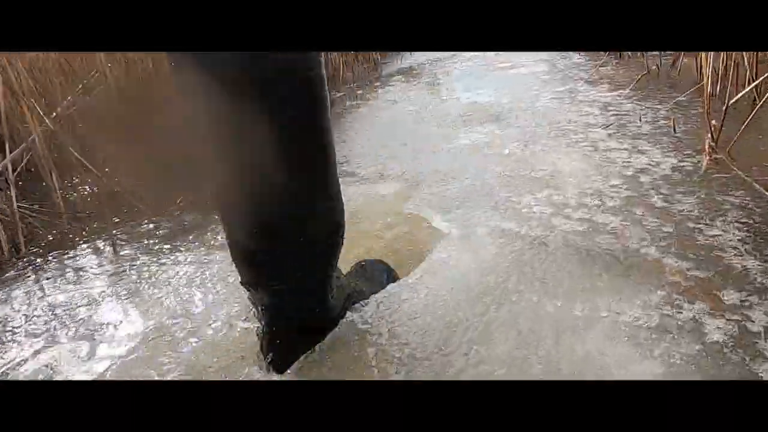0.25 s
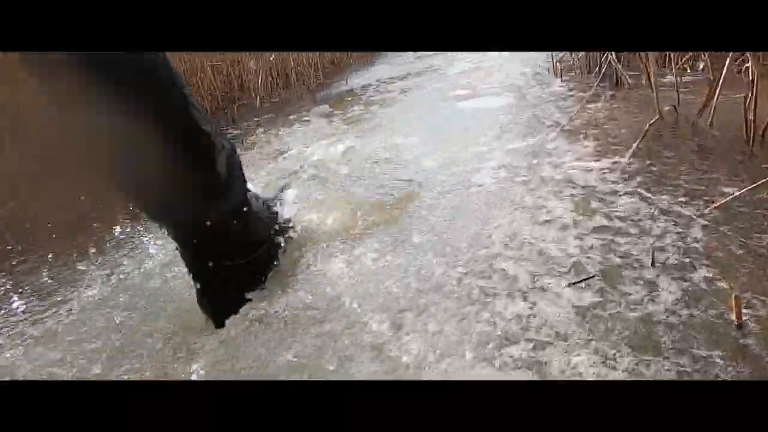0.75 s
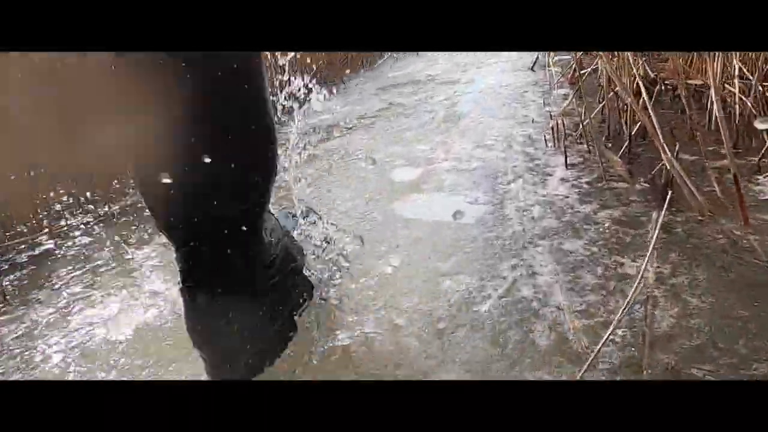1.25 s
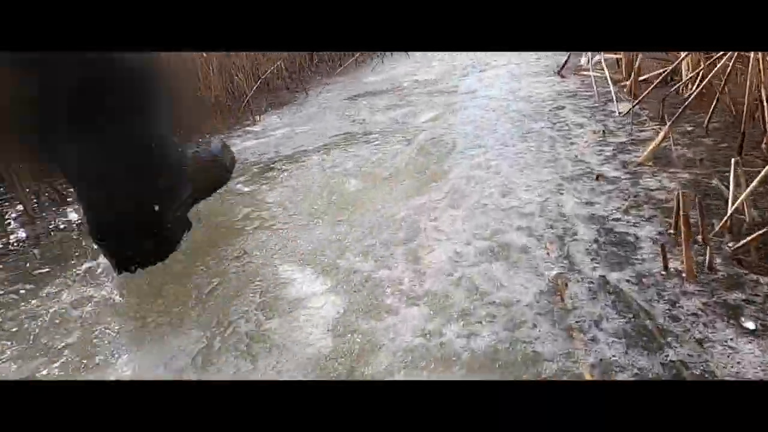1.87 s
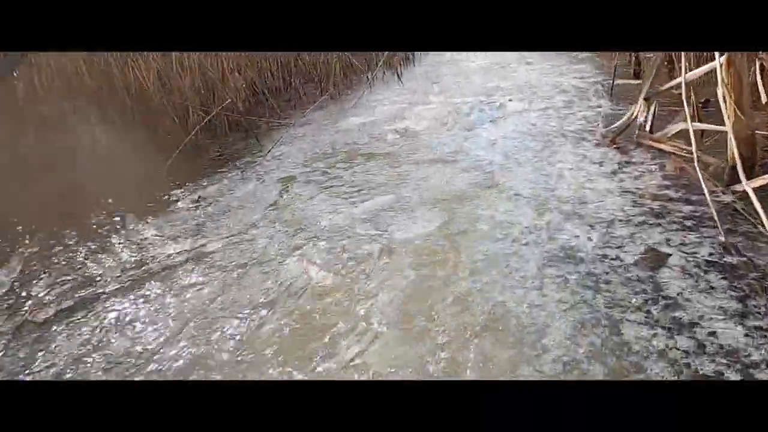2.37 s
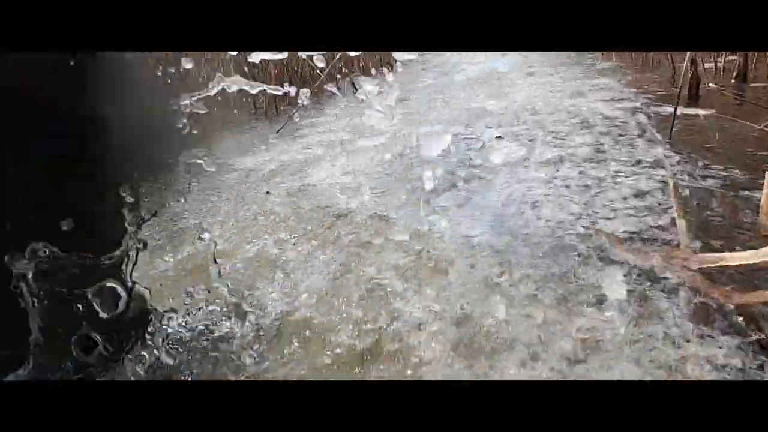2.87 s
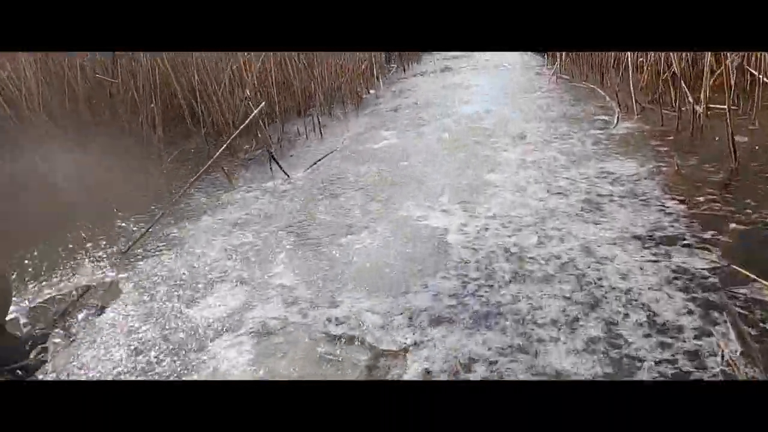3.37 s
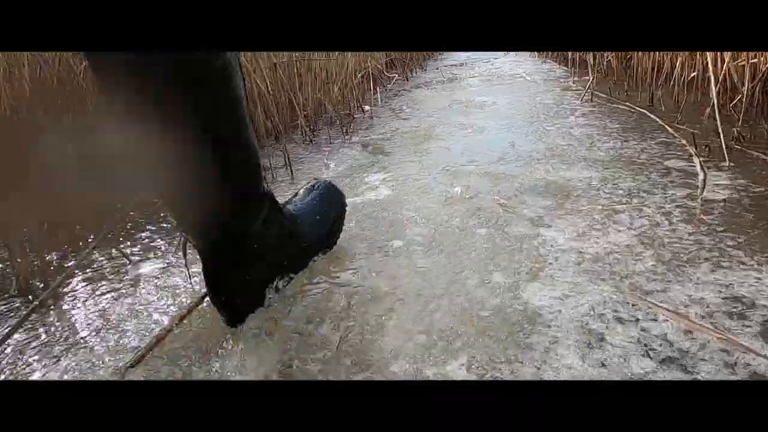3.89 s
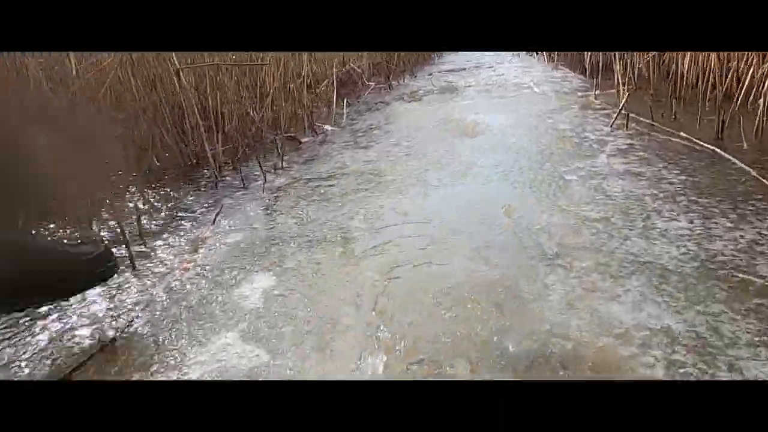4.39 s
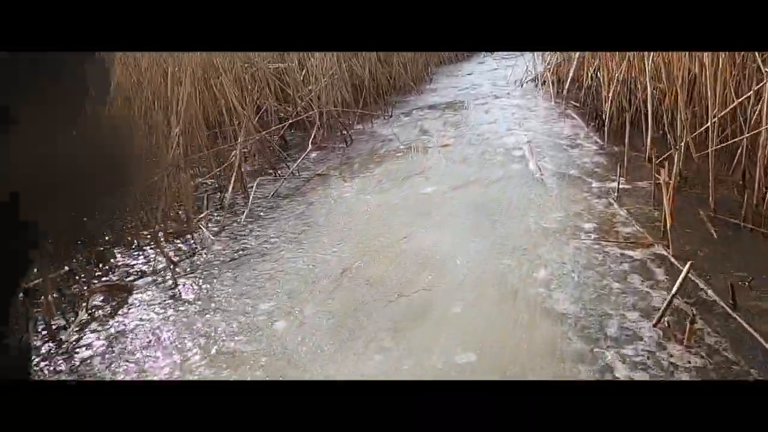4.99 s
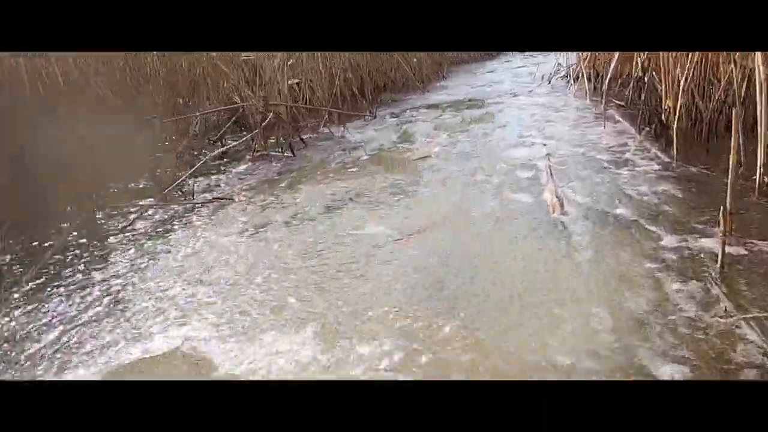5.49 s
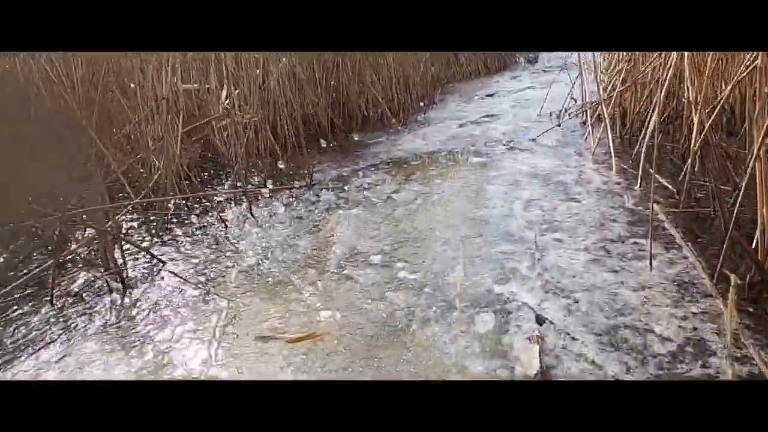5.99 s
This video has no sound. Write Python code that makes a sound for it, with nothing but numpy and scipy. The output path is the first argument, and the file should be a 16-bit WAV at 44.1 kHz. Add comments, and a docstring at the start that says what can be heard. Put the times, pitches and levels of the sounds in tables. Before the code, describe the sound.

Heavy wet footfalls at an uneven walking pace, outdoors among reeds: flat water slaps, churning glugs, pattering spray and small brittle ice snaps. A brief dry rustle brushes past at the start, a deep hollow plunge comes a little before the middle, and rising slurps follow later steps. Sound is mono, very close and muffled, treble dulled, with rumble from the swaying case and hardly any background between steps.

```python
"""A reedy channel of shallow water under thin, rotten ice: rubber boots wade it, ten steps in six seconds.
Each step crunches ice and throws spray (showers of random impacts, shaped by a colour) and drags air under,
which gulps and bubbles (short ringing notes of sliding pitch) as the water closes again.
The microphone rides low beside the legs in a closed case, which dulls the treble and adds rumble and hum."""
import sys
import numpy as np
from scipy import signal
from scipy.fft import rfft, irfft, next_fast_len
from scipy.io import wavfile
from scipy.ndimage import uniform_filter1d

SR = 44100
rng = np.random.default_rng(int(sys.argv[2]) if len(sys.argv) > 2 else 0)


def generate_wav(signal):
    """Clip the signal to [-1, 1] and save it as 16-bit WAV at the path in sys.argv[1]."""
    frames = np.transpose(np.atleast_2d(signal))
    scaled = np.clip(frames, -1, 1) * 32767
    pcm = np.round(scaled).astype(np.int16)
    wavfile.write(sys.argv[1], SR, pcm)


N = 275625
TIME = np.arange(N) / SR


def from_db(db):
    """Amplitude ratio of a level in dB."""
    return 10 ** (np.asarray(db) / 20)


def rms_one(x):
    """Scale to an rms of 1."""
    return x / np.sqrt(np.mean(x ** 2) + 1e-20)


def add(out, s, sound):
    """Mix a sound in at time s."""
    at = max(round(s * SR), 0)
    out[at:at + len(sound)] += sound[:N - at]


def colour(x, spectrum):
    """Causal (minimum-phase) filter with the given spectrum, built by folding its cepstrum."""
    size = 2 * next_fast_len(len(x) // 2 + SR // 16, real=True)
    hz, db = np.transpose(spectrum)
    bins = np.maximum(np.arange(size // 2 + 1) * SR / size, 1)
    bins_db = np.interp(np.log(bins), np.log(hz), db)
    cepstrum = irfft(np.log(from_db(bins_db)))
    cepstrum[1:size // 2] *= 2
    cepstrum[size // 2 + 1:] = 0
    response = np.exp(rfft(cepstrum))
    return irfft(rfft(x, size) * response)[:len(x)]


def evened(x, span_s):
    """Level swings slower than the span are evened out, the finer grain is left in; rms 1 overall."""
    power = uniform_filter1d(x ** 2, max(int(span_s * SR), 2))
    floor = 0.055 * np.mean(x ** 2)
    return rms_one(x / np.sqrt(np.abs(power) + floor))


def clicks(per_s, spread_db, size=N):
    """Random impacts of either sign: a few stand out if the spread is positive, a few are weak if negative."""
    heights = from_db(spread_db * np.minimum(rng.exponential(1, size), 4))
    signs = rng.choice([-1, 1], size)
    return heights * signs * (rng.random(size) < per_s / SR)


def pocket(first_hz, last_hz, swell_s):
    """A pocket of air swells, rings and dies while its pitch slides; height at most 1."""
    age = np.arange(int(12 * swell_s * SR) + 2) / (swell_s * SR)  # in swell times
    hz = last_hz + (first_hz - last_hz) * np.exp(-age / 1.21)
    envelope = (age * np.exp(1 - age)) ** 1.5
    return envelope * np.sin(2 * np.pi * np.cumsum(hz) / SR)


def bubble_cloud(low_hz, high_hz, cycles, rise, spread_db, count):
    """Small resonators of all sizes ring at random times; each pitch slides by the factor rise."""
    out = np.zeros(N)
    for when, size, strength, damping in rng.random((count, 4)):
        hz = low_hz * (high_hz / low_hz) ** size
        height = from_db(-spread_db * np.log(max(strength, .02))) * hz / high_hz
        swell_s = cycles * (.5 + damping) / hz
        add(out, when * N / SR, height * pocket(hz, hz * rise, swell_s))
    return rms_one(out)


def burst(spectrum, fade_s, per_s, spread_db):
    """A first impact and a dying shower of further ones; height 1."""
    age = TIME[:SR // 8]
    shower = clicks(per_s, spread_db, size=len(age)) * np.exp(-age / max(fade_s, .001))
    shower[0] = np.abs(shower).max() + 1e-9
    sound = colour(shower, spectrum)
    return sound / np.abs(sound).max()


def stroke(s, attack_s, hold_s, sag_db_per_s, release_db_per_s):
    """Power of one movement: a quick rise, a sagging hold, a release."""
    age = np.maximum(TIME - s, 0)
    fall_db = sag_db_per_s * age + release_db_per_s * np.maximum(age - hold_s, 0)
    rise = np.minimum(age / attack_s, 1)
    return (rise * from_db(-np.minimum(fall_db, 150))) ** 2


# constant running water, colour in the case: f/Hz, level/dB
TRICKLE_COLOUR = [(500, -20.5), (1500, -2), (2700, 1), (4000, -3.5), (5300, -9.5), (6500, -24.5),
                  (8000, -35.5), (15000, -37.5)]


def trickle():
    """Background: water drips off the boots and runs between the floes all the time."""
    drips = bubble_cloud(1200, 4200, cycles=1.9, rise=1.2, spread_db=5.0, count=2400)
    patter = rms_one(clicks(per_s=54, spread_db=2.0))
    wash = rng.standard_normal(N)
    mix = from_db(-15) * drips + from_db(-4.5) * patter + wash
    return from_db(-69.0) * rms_one(colour(mix, TRICKLE_COLOUR))


# jolts of the microphone case: t/s, length/s, level/dB
CASE_JOLTS = [(0.0, 0.096, -30), (0.407, .03, -33.5), (0.567, .03, -36), (0.986, 0.087, -32.5),
              (1.6, 0.097, -33), (2.108, 0.18, -37), (2.369, 0.045, -25.5), (2.547, 0.093, -36.5),
              (2.8, .03, -35.5), (3.208, 0.044, -30.5), (3.35, 0.036, -30), (5.477, 0.038, -40)]
JOLT_ATTACK_S, JOLT_RELEASE_DB_PER_S = .015, 158.5
SWAY_DB, SWAY_FOLLOWS = -47.5, 0.9   # rumble at an average churn; share of the churn's swing in dB


def buffeting(churn_db):
    """Level in dB of the rumble: the case sways with the legs' effort and takes a few jolts."""
    power = from_db(SWAY_DB + SWAY_FOLLOWS * (churn_db - churn_db.mean())) ** 2
    for s, length_s, db in CASE_JOLTS:
        jolt = stroke(s, JOLT_ATTACK_S, length_s, 0, JOLT_RELEASE_DB_PER_S)
        power = power + from_db(db) ** 2 * jolt
    return 10 * np.log10(power)


# rumble of the swinging case: f/Hz, level/dB
RUMBLE_COLOUR = [(12, -2), (28, -9), (65, -3), (100, -8.5), (170, -24.5), (400, -61.5), (2000, -100)]
# faint hum of the case: f/Hz, level/dB
HUM_COLOUR = [(40, -44), (80, -23), (95, -4), (112, -20), (220, -40.5), (2000, -100)]


def case_noise(buffet_db):
    """The swinging case rumbles, hums faintly near 95 Hz and gives one thin, high tick."""
    out = from_db(buffet_db) * evened(colour(rng.standard_normal(N), RUMBLE_COLOUR), span_s=0.13)
    out += from_db(-50.5) * evened(colour(rng.standard_normal(N), HUM_COLOUR), span_s=0.028)
    tick_band = signal.butter(2, [11800, 15000], "band", fs=SR, output="sos")
    tick = clicks(per_s=5500, spread_db=-6.0, size=SR // 400)
    for _ in range(2):
        tick = signal.sosfilt(tick_band, tick)
    tick = tick * np.hanning(len(tick))
    add(out, 3.1215, from_db(-47) * rms_one(tick))
    return out


# dry reeds brushing past at the start: t/s, level/dB
REED_BRUSHES = [(0, -66), (.15, -66), (.25, -71.5), (.39, -53.5), (.45, -74), (.56, -74), (.62, -90)]
# rustle of the reeds: f/Hz, level/dB
REED_COLOUR = [(1000, -14), (2800, 5.5), (4000, 0), (5400, -12.5), (6800, -14.5), (8200, -26),
               (9800, -17.5), (11500, -33.5), (15000, -39.5)]


def reeds():
    """Dry stalks rub in a fine, dense rustle of tiny impacts."""
    brush_s, level_db = np.transpose(REED_BRUSHES)
    brush_db = np.interp(TIME, brush_s, level_db)
    return from_db(brush_db) * rms_one(colour(clicks(per_s=9000, spread_db=-3.5), REED_COLOUR))


# loose plates knocking together or on a boot: t/s, peak level/dB
PLATE_KNOCKS = [(0.2212, -10), (0.5148, -14), (.803, -28), (1.222, -14.5), (2.37, -25), (2.5781, -16),
                (2.934, -24), (3.264, -29), (3.361, -23), (3.398, -15.5), (4.0102, -26), (4.471, -26),
                (4.522, -30), (4.57, -30), (4.957, -26), (4.986, -18.5), (5.2729, -29), (5.2942, -20.5),
                (5.571, -29), (5.738, -20.5), (5.81, -21)]
# one plate contact: f/Hz, level/dB
KNOCK_COLOUR = [(100, -21), (400, 0.5), (1050, 4), (1500, 0.5), (2400, -22), (3400, -30.5), (5000, -46),
                (8000, -67)]


def knocks():
    """One hard contact each, dead within a few milliseconds because the plates are wet."""
    out = np.zeros(N)
    knock = colour(signal.unit_impulse(SR // 20), KNOCK_COLOUR)
    for s, db in PLATE_KNOCKS:
        add(out, s, from_db(db) * knock / np.abs(knock).max())
    return out


# holes in the water closing behind a boot: t/s, length/s, first f/Hz, last f/Hz, level/dB before its fades
CLOSING_HOLES = [(1.676, 0.067, 322, 1250, -29), (3.481, 0.043, 693, 1145, -30.5),
                 (3.61, 0.072, 555, 1146, -31.5), (3.7, 0.063, 485, 1093, -28),
                 (4.134, 0.082, 478, 920, -33), (5.638, 0.13, 297.6, 880, -30.5),
                 (5.976, 0.055, 981, 1096, -24.5), (6.171, 0.058, 329, 920, -24.5)]


def slurps():
    """A shrinking hole rings ever higher as the water rushes in, a wavering note with froth around it."""
    out = np.zeros(N)
    waver = signal.butter(2, 65, fs=SR, output="sos")  # low-pass, Hz
    for s, length_s, first_hz, last_hz, db in CLOSING_HOLES:
        progress = np.linspace(0, 1, int(length_s * SR))
        hz = first_hz * (last_hz / first_hz) ** progress
        phase = 2 * np.pi * np.cumsum(hz) / SR
        rush = signal.sosfilt(waver, rng.standard_normal((2, SR // 2)))
        rush = rms_one(rush)[:, -len(phase):]
        ringing = rms_one((0.61 + rush[0]) * np.cos(phase) + rush[1] * np.sin(phase))
        add(out, s, from_db(db) * ringing * np.sqrt(np.abs(np.sin(np.pi * progress))))
    return out


# air pockets opening under a boot: t/s, peak level/dB (at most), starting f/Hz, swell time/s
AIR_GULPS = [(0.209, -11.5, 1530, 0.0012), (.258, -13, 327, 0.0023), (.281, -17, 285, 0.0053),
             (0.444, -12.5, 170, 0.0023), (.849, -12.5, 516, 0.0024), (1.082, -17.5, 504, 0.0038),
             (1.149, -9, 465, 0.002), (1.315, -24, 255, 0.0022), (1.439, -16, 437, 0.0078),
             (1.687, -21, 466, 0.0052), (1.794, -13.5, 895, 0.0008), (2.371, -14.5, 1080, 0.0067),
             (2.391, -13.5, 785, 0.0026), (2.577, -7, 960, 0.0013), (2.756, -13, 540, 0.0021),
             (2.829, -16, 620, 0.0045), (2.933, -7, 730, 0.0016), (2.973, -19.5, 278, .0023),
             (3.245, -24.5, 140, 0.0023), (3.361, -13, 225, 0.0018), (3.4, -14, 450, 0.0031),
             (3.969, -11, 800, 0.00081), (3.97, -16, 312, 0.0035), (4.131, -15.5, 275, 0.0053),
             (4.674, -9, 300, 0.0018), (4.701, -19, 196, 0.0031), (4.96, -11.5, 282, 0.0012),
             (4.961, -11, 940, 0.0025), (5.455, -25, 195, .0056), (5.688, -18, 630, 0.0027),
             (5.905, -23, 270, 0.0024), (5.924, -28, 202, .004)]
GULP_FALL = 0.66   # last pitch over first
# single clear bubbles: t/s, peak level/dB (at most), middle f/Hz
CLEAR_BUBBLES = [(1.248, -20, 796), (1.306, -20, 896), (2.454, -18.5, 840), (2.629, -23, 890),
                 (2.869, -14, 846), (2.973, -17.5, 990), (3.095, -22.5, 605), (3.282, -20, 615),
                 (3.473, -16.5, 810), (3.529, -15, 640), (3.574, -21.5, 660), (3.595, -18, 710),
                 (3.704, -18, 562), (3.794, -21, 680), (4.193, -15, 740), (4.915, -21.5, 830),
                 (5.013, -23.5, 720), (5.042, -19, 644), (5.108, -24, 615), (5.151, -26, 830),
                 (5.178, -27, 556), (5.997, -20, 1040)]
BUBBLE_SWELL_S = 0.0025
STRAY_DB = -22   # further bubbles of like pitch surface at random, relative to the spray level


def air_pockets(spray_db):
    """Opening pockets fall in pitch; free bubbles rise."""
    strays = bubble_cloud(520, 1150, cycles=2.4, rise=1.5, spread_db=1.5, count=120)
    out = from_db(STRAY_DB + spray_db) * strays
    for s, db, hz, swell_s in AIR_GULPS:
        add(out, s, from_db(db) * pocket(hz, hz * GULP_FALL, swell_s))
    for s, db, hz in CLEAR_BUBBLES:
        add(out, s, from_db(db) * pocket(hz * 0.833, hz * 1.086, BUBBLE_SWELL_S))
    return out


def plunge():
    """One boot drops through into a hollow: a big cavity booms, sinking in pitch as it deepens."""
    out = np.zeros(N)
    add(out, 2.376, from_db(-14) * pocket(430, 150, .008))
    add(out, 2.396, from_db(-16) * pocket(120, 56, .014))
    return out


# a boot breaks in and pushes on: t/s, push/s, crunch/s, sole slap peak level/dB,
# then spray, churned water and crunching ice level/dB, each before its layer's trim
STEPS_TAKEN = [(0.199, 0.29, 0.22, -11.5, -24.5, -23, -44), (.846, 0.14, 0.026, -18.5, -22, -25, -38.5),
               (1.371, .22, 0.11, -25, -23.5, -30.5, -40.5), (2.079, .25, 0.021, -16, -23.5, -23.5, -41.5),
               (2.651, 0.42, 0.042, -22, -25, -35.5, -43.5), (3.361, 0.044, 0.073, -15, -25.5, -26, -48),
               (4.008, 0.27, 0.042, -28, -25, -25.5, -40), (4.669, 0.097, 0.055, -11, -21, -27.5, -43.5),
               (5.292, .37, .04, -15.5, -27.5, -28.5, -43.5),
               (5.905, 0.11, 0.027, -10, -24.5, -27.5, -44.5)]
# a leg shifts its weight or drags free: t/s, length/s, spray, churned water, crunching ice level/dB (untrimmed)
LEG_SURGES = [(0.0, 0.018, -40.5, -32, -55), (0.047, .12, -49, -43, -78), (0.259, .06, -27, -27, -51),
              (0.541, 0.03, -38.5, -28, -60), (.765, 0.022, -35.5, -44, -56),
              (0.821, 0.022, -47, -25.5, -65), (1.153, .025, -20, -28.5, -43),
              (1.281, 0.08, -36, -34.5, -57), (1.432, 0.041, -20, -20.5, -37.5),
              (1.527, 0.046, -34, -35.5, -57.5), (1.613, 0.02, -32, -24.5, -66),
              (1.716, 0.047, -36.5, -29.5, -52.5), (2.363, 0.037, -29.5, -18, -52.5),
              (2.565, 0.0081, -29.5, -28.5, -70), (2.803, .13, -27, -26.5, -59),
              (3.102, 0.22, -33, -41.5, -52), (3.453, .065, -26.5, -34, -51), (3.651, 0.086, -31, -36, -58),
              (3.771, 0.12, -35.5, -38.5, -58), (3.945, 0.052, -34.5, -41.5, -49.5),
              (4.336, 0.028, -36, -32.5, -64), (4.491, 0.052, -33.5, -38.5, -71),
              (4.913, 0.074, -31.5, -38, -54.5), (5.573, .2, -31.5, -51.5, -57),
              (5.831, .025, -40, -39, -60), (6.17, 0.039, -27.5, -34.5, -55)]
SURGE_ATTACK_S, SURGE_RELEASE_DB_PER_S = 0.0054, 398
# what keeps moving after a step; rows spray, churned water, ice: level/dB relative to the step, fade/(dB/s)
AFTER_STEP = [(-6.5, 20), (-8, 22.5), (-9.5, 23.5)]
# the channel between steps: spray, churned water, ice level/dB (untrimmed)
CALM_LEVELS = [-51.5, -55.5, -63.5]
ATTACK_S = 0.0044
TOE_LEAD_S, TOE_DB = 0.0083, [-5.5, -14.5, -13.5]   # the toe dips in first: spray, churn, ice re the step


def wading(layer, holds_s, sag_db_per_s, release_db_per_s):
    """Level in dB of spray (0), churn (1) or ice (2): steps, their settling and the surges add up."""
    power = from_db(CALM_LEVELS[layer]) ** 2
    settle_db, settle_db_per_s = AFTER_STEP[layer]
    for (s, _, _, _, *levels_db), hold_s in zip(STEPS_TAKEN, holds_s):
        toe = stroke(s - TOE_LEAD_S, TOE_LEAD_S, TOE_LEAD_S, 0, release_db_per_s)
        push = stroke(s, ATTACK_S, hold_s, sag_db_per_s, release_db_per_s)
        settle = stroke(s, ATTACK_S, 0, 0, settle_db_per_s)
        step = from_db(TOE_DB[layer]) ** 2 * toe + push + from_db(settle_db) ** 2 * settle
        power = power + from_db(levels_db[layer]) ** 2 * step
    for s, length_s, *levels_db in LEG_SURGES:
        surge = stroke(s, SURGE_ATTACK_S, length_s, 0, SURGE_RELEASE_DB_PER_S)
        power = power + from_db(levels_db[layer]) ** 2 * surge
    return 10 * np.log10(power)


# spray through the case: f/Hz, level/dB
SPRAY_COLOUR = [(200, -33), (400, -1), (560, -2.5), (800, 1), (1080, 0.5), (1350, -11), (1750, -20),
                (2400, -39.5), (4000, -51), (8000, -103.5)]


def spray(level_db):
    """Thrown water patters back and beats small bubbles into the surface."""
    drops = rms_one(clicks(per_s=1500, spread_db=3.0))
    fizz = bubble_cloud(436.4, 1530, cycles=2.31, rise=1.194, spread_db=1.5, count=2400)
    mix = colour(drops + from_db(-9.5) * fizz, SPRAY_COLOUR)
    return from_db(level_db - 0.99) * evened(mix, span_s=0.072)


# churned water through the case: f/Hz, level/dB
CHURN_COLOUR = [(30, -34.5), (70, -7.5), (120, -1.5), (180, -0.5), (280, -3), (430, -5), (600, -13.5),
                (900, -14), (2000, -50), (6000, -100)]


def churn(level_db):
    """The boot shoves water aside and folds big, quickly damped bubbles under."""
    shoves = rms_one(clicks(per_s=820, spread_db=4.5))
    glugs = bubble_cloud(129.8, 576, cycles=1.05, rise=1.059, spread_db=3.5, count=800)
    mix = colour(shoves + from_db(-12.0) * glugs, CHURN_COLOUR)
    return from_db(level_db - 3.0) * evened(mix, span_s=0.043)


# heel or ice plate slapping the water: t/s, peak level/dB, fade/s
WATER_SLAPS = [(.252, -11, .018), (0.51, -13, 0.012), (.542, -17, 0.013), (.972, -32, 0.022),
               (1.148, -14.5, .009), (1.305, -17.5, 0.01), (1.485, -8.5, 0.02), (1.526, -12.5, 0.0055),
               (2.104, -11, .014), (2.332, -14, .007), (2.712, -10.5, .011), (2.856, -17, 0.0078),
               (2.923, -14, 0.0075), (3.398, -12, 0.0096), (4.326, -15.5, 0.021), (4.471, -22.5, 0.022),
               (4.513, -12.5, 0.016), (4.695, -12, .011), (4.718, -12, 0.016), (4.961, -14.5, 0.0059),
               (5.365, -11.5, 0.0062), (5.921, -8, 0.0059), (6.167, -16, 0.013)]
# a flat blow through the case: f/Hz, level/dB
SLAP_COLOUR = [(40, -9), (170, 6.5), (400, 2), (1050, 1.5), (1400, -8.5), (2000, -24), (3200, -37.5),
               (5000, -49.5), (8000, -84)]
STEP_SLAP_FADE_S = 0.025
WATER_LAG_S = .004   # the ice gives first; the sole meets the water this much later


def slaps():
    """Flat blows on the water, the soles' landings included, each a dense shower of impacts."""
    out = np.zeros(N)
    landings = [(s + WATER_LAG_S, slap_db, STEP_SLAP_FADE_S) for s, _, _, slap_db, *_ in STEPS_TAKEN]
    for s, db, fade_s in landings + WATER_SLAPS:
        add(out, s, from_db(db) * burst(SLAP_COLOUR, fade_s, per_s=2200, spread_db=-2.0))
    return out


CLUMP_S, CLUMP_DB = .014, 2   # time between random levels; their standard deviation


def clumps():
    """The ice gives way in uneven clumps: a level in dB that wanders quickly at random."""
    knots = np.arange(0, N / SR + 1, CLUMP_S)
    return CLUMP_DB * np.interp(TIME, knots, rng.standard_normal(len(knots)))


# ice through the case: f/Hz, level/dB
ICE_COLOUR = [(400, -15), (1200, 3.5), (1900, 3.5), (2700, -5.5), (3700, -15), (5000, -25), (6300, -39),
              (8000, -56.5), (15000, -51.5)]


def splinters(level_db):
    """Loose shards snap singly at random, rising and falling with the crunch."""
    snaps = rms_one(colour(clicks(per_s=37, spread_db=3.0), ICE_COLOUR))
    return from_db(level_db - 7) * snaps


# later ice snaps: t/s, peak level/dB
LATER_CRACKS = [(.2537, -20.5), (0.309, -29), (.349, -26), (0.5558, -33), (1.175, -28.5), (1.6314, -41),
                (1.74, -34), (2.371, -32), (2.579, -33.5), (2.9068, -35), (3.186, -30), (3.2624, -34),
                (3.4576, -27.5), (3.83, -38.5), (4.4042, -34.5), (4.695, -30), (4.956, -41), (5.374, -42.5),
                (5.5713, -35)]
STEP_CRACK_DB, CRACK_FADE_S = 14, 0.0036   # each step opens with a snap, this far above its ice level


def ice(level_db):
    """The sheet crumbles in tiny fractures, loose shards clink, and plates give way with sharp snaps."""
    fractures = rms_one(clicks(per_s=2600, spread_db=-0.5))
    shards = bubble_cloud(1417, 4400, cycles=3.0, rise=0.96, spread_db=3.0, count=7000)
    slush = rng.standard_normal(N)
    crunch = colour(fractures + from_db(-8.5) * shards + from_db(-6.5) * slush, ICE_COLOUR)
    out = from_db(level_db + 1.5) * evened(crunch, span_s=0.053)
    first_snaps = [(s, ice_db + STEP_CRACK_DB) for s, *_, ice_db in STEPS_TAKEN]
    for s, db in first_snaps + LATER_CRACKS:
        add(out, s, from_db(db) * burst(ICE_COLOUR, CRACK_FADE_S, per_s=1700, spread_db=1.5))
    return out


def scene():
    """The steps drive water, ice and the swaying case."""
    _, push_s, crunch_s, *_ = np.transpose(STEPS_TAKEN)
    spray_db = wading(0, push_s, sag_db_per_s=14, release_db_per_s=132.5)
    churn_db = wading(1, push_s, sag_db_per_s=17.5, release_db_per_s=140)
    ice_db = wading(2, crunch_s, sag_db_per_s=7, release_db_per_s=134)
    surroundings = trickle() + case_noise(buffeting(churn_db)) + reeds()
    air = air_pockets(spray_db) + slurps() + plunge()
    water = spray(spray_db) + churn(churn_db) + slaps()
    sheet = knocks() + splinters(ice_db) + ice(ice_db + clumps())
    return (surroundings + air + water + sheet)[None]


def record(dry):
    """The microphone's highest treble is cut steeply, 70 dB down from 16.8 kHz up."""
    return signal.sosfilt(signal.cheby2(12, 70, 16800, fs=SR, output="sos"), dry)


dry = scene()
out = record(dry)
generate_wav(out)
```